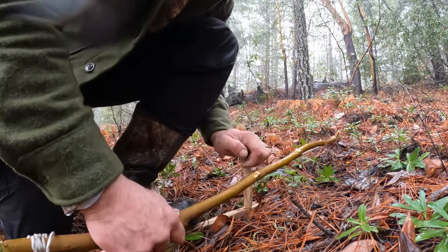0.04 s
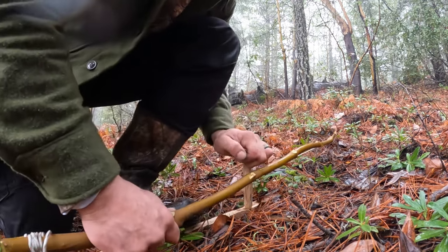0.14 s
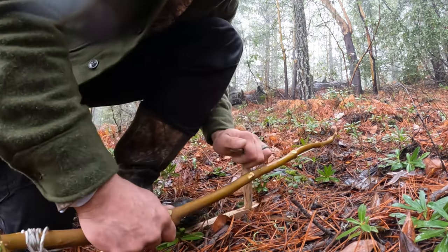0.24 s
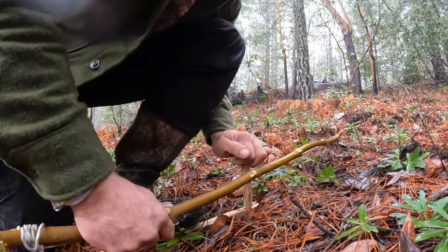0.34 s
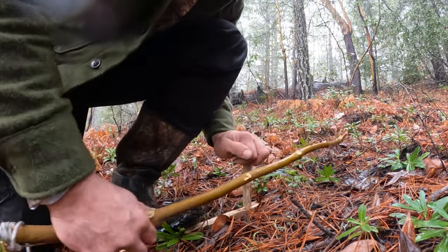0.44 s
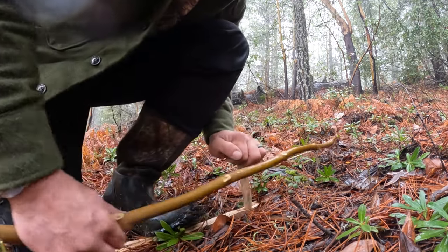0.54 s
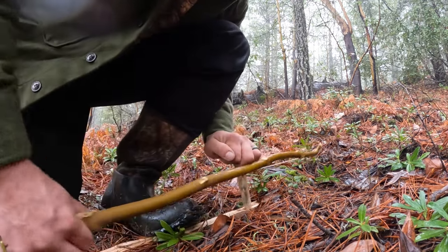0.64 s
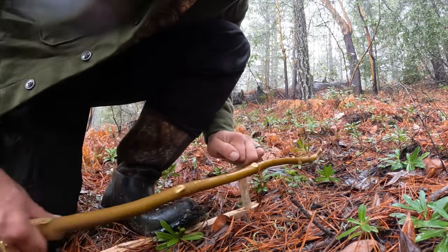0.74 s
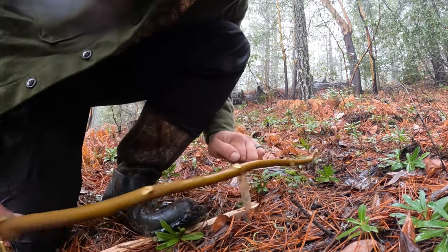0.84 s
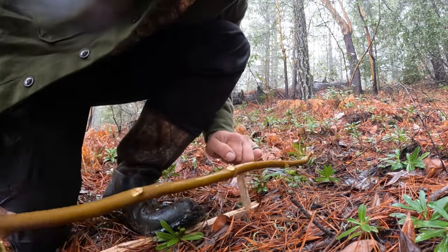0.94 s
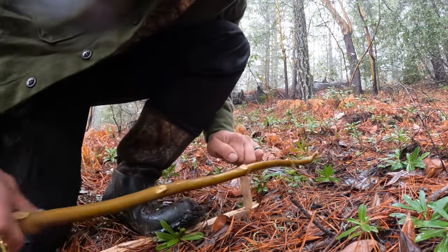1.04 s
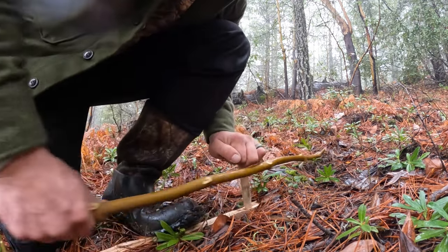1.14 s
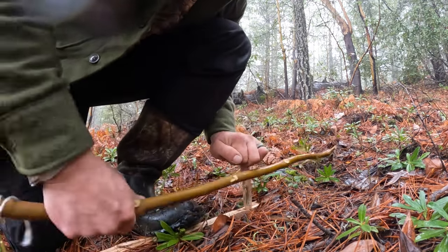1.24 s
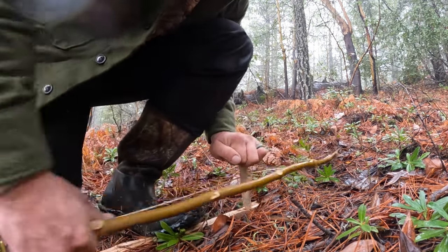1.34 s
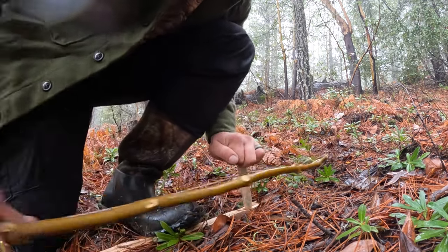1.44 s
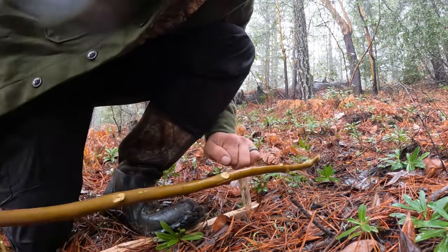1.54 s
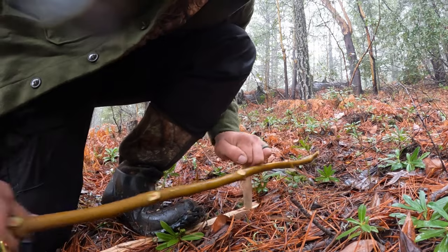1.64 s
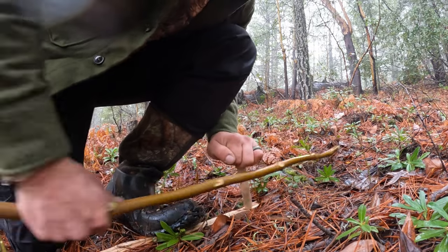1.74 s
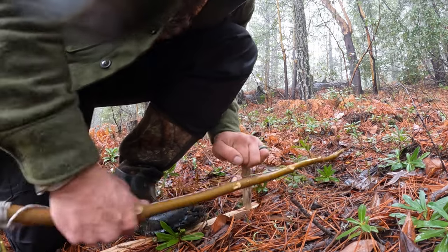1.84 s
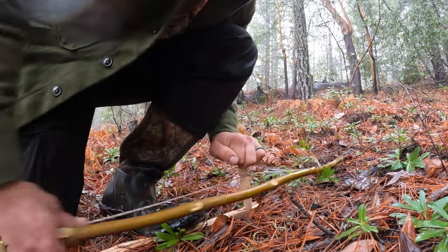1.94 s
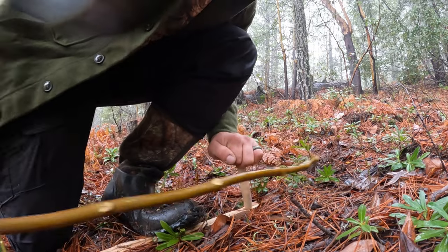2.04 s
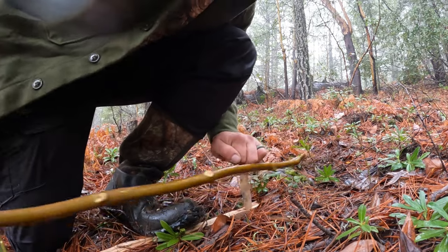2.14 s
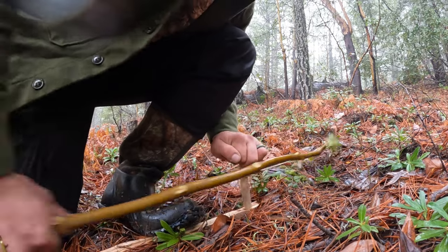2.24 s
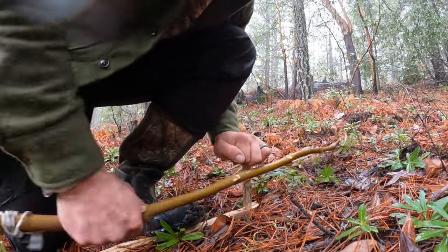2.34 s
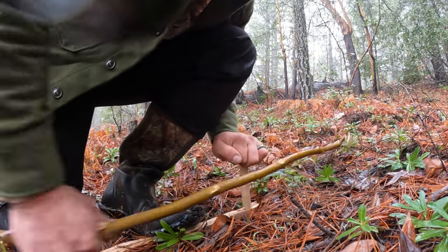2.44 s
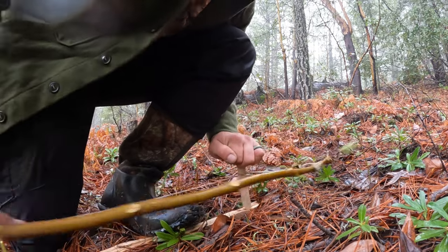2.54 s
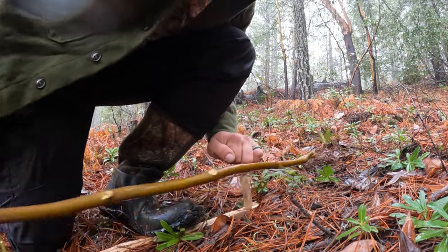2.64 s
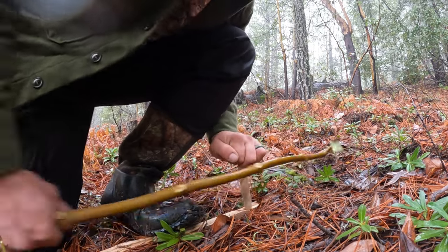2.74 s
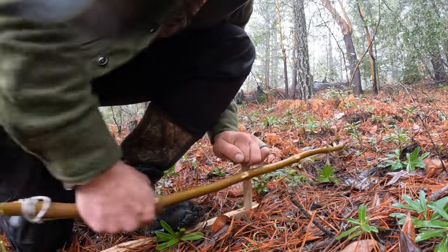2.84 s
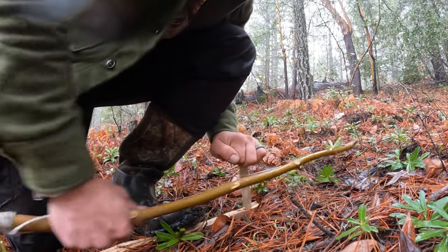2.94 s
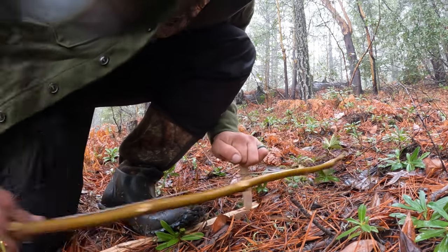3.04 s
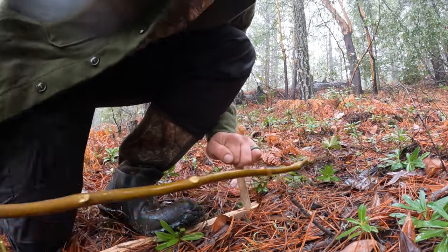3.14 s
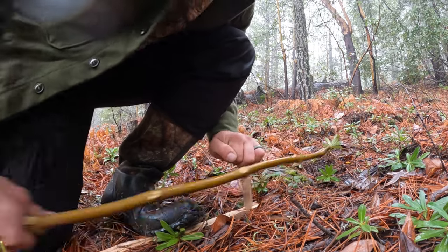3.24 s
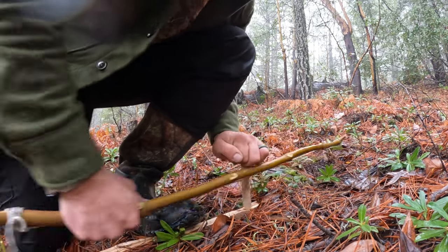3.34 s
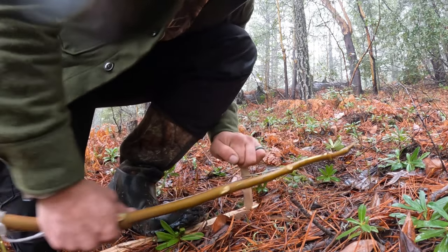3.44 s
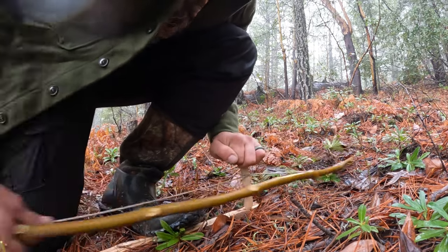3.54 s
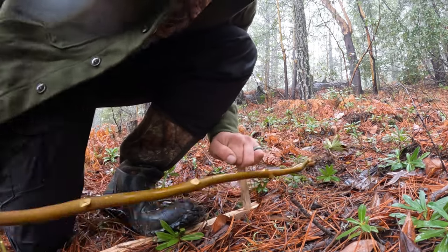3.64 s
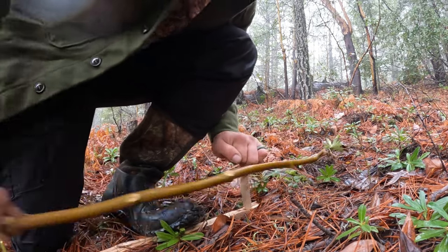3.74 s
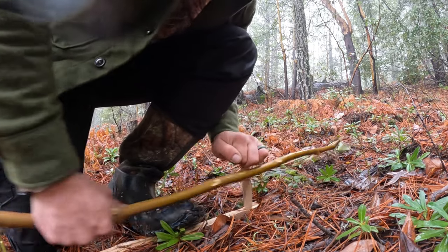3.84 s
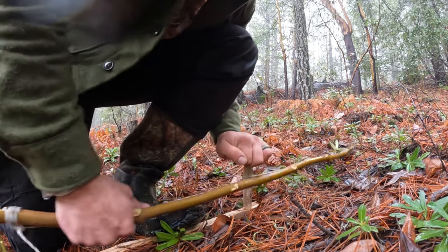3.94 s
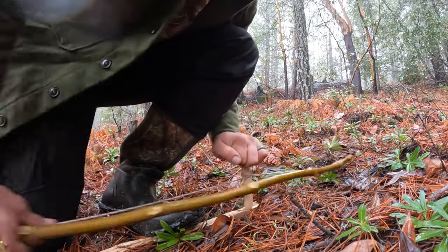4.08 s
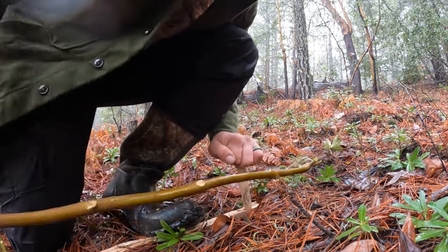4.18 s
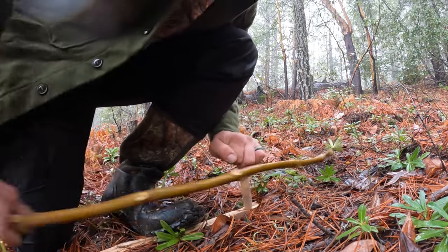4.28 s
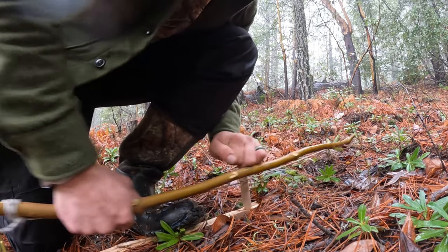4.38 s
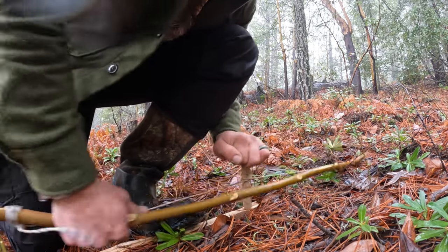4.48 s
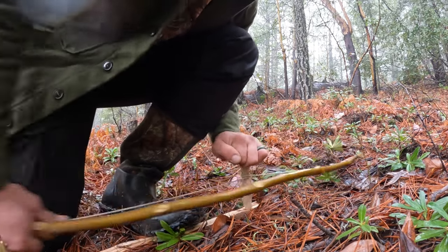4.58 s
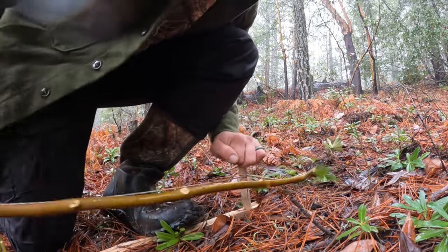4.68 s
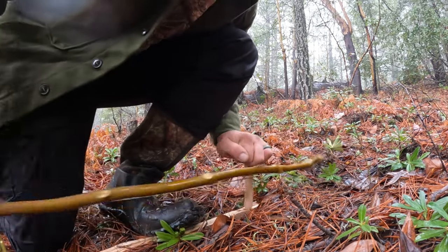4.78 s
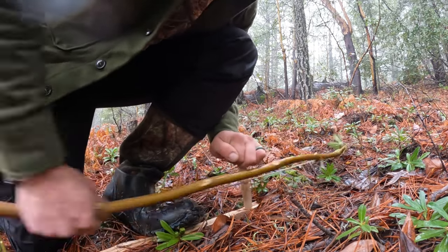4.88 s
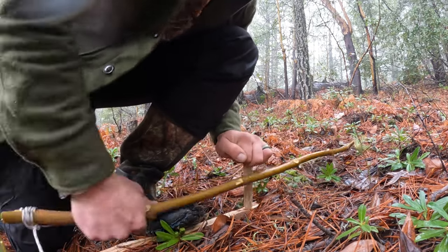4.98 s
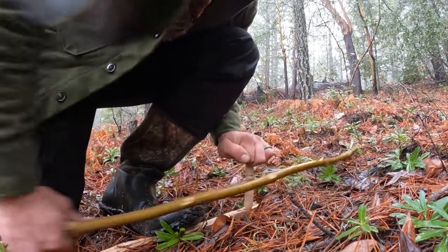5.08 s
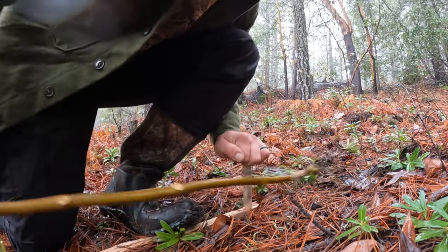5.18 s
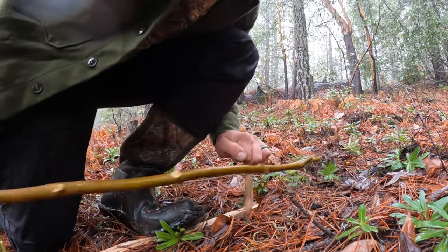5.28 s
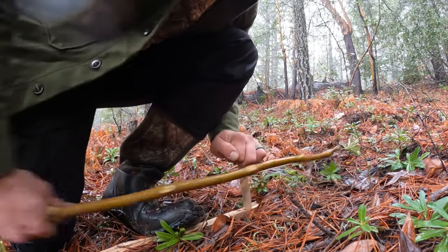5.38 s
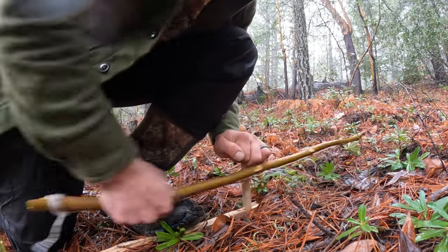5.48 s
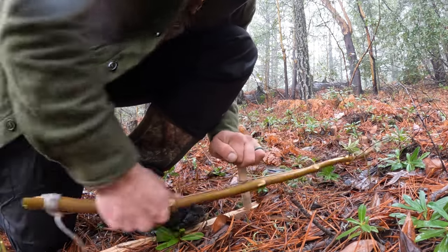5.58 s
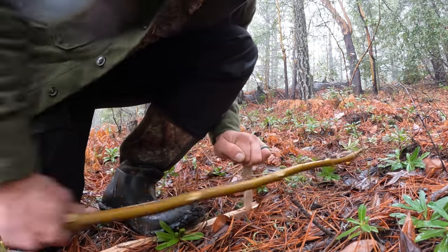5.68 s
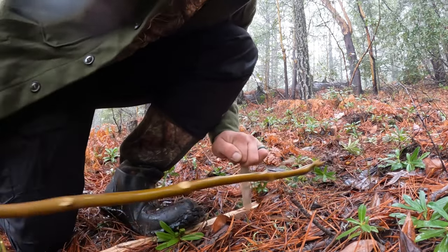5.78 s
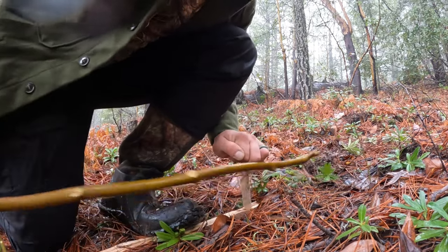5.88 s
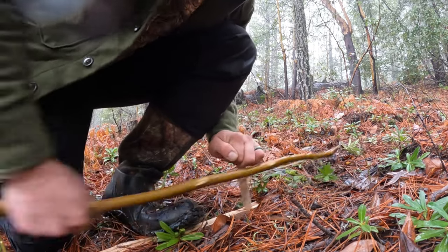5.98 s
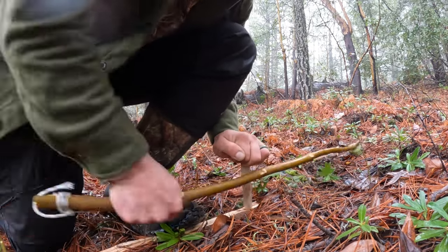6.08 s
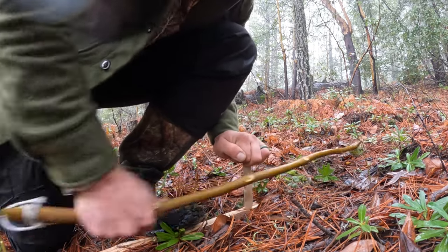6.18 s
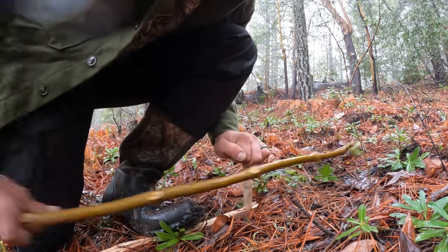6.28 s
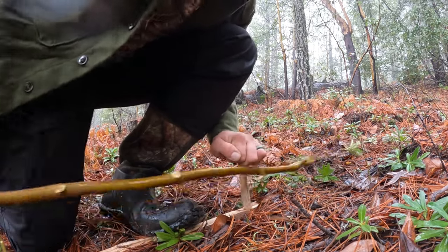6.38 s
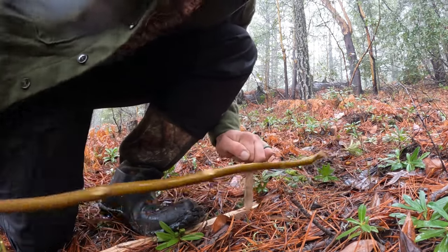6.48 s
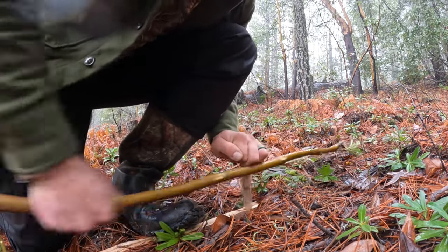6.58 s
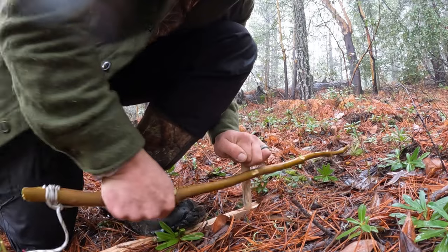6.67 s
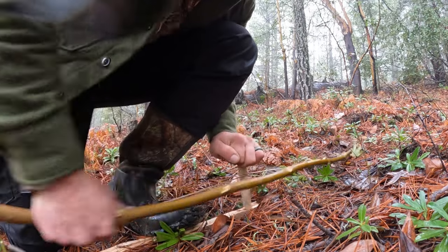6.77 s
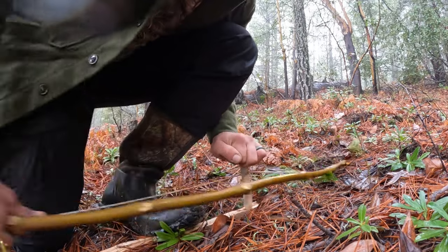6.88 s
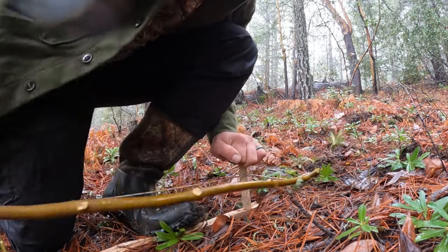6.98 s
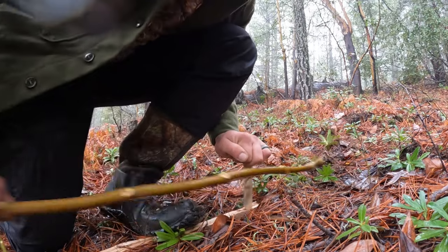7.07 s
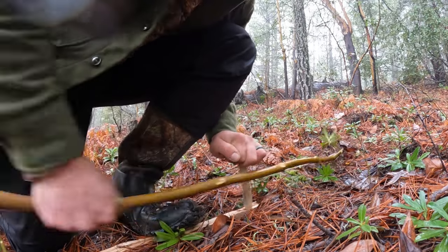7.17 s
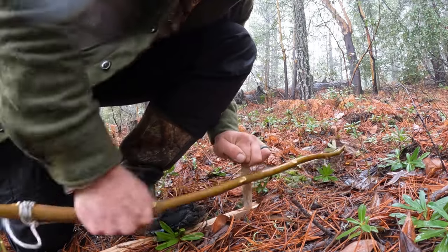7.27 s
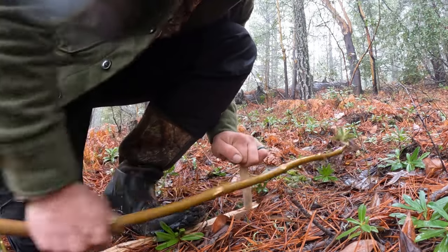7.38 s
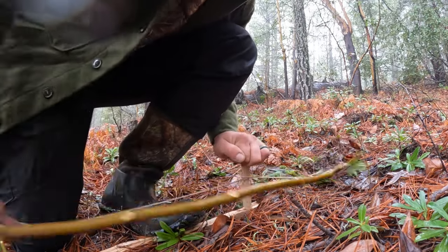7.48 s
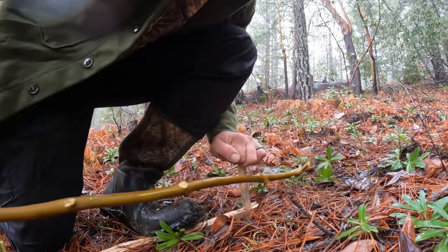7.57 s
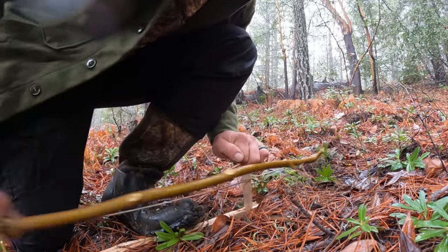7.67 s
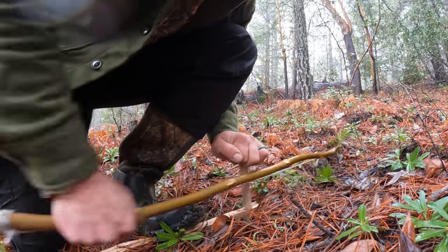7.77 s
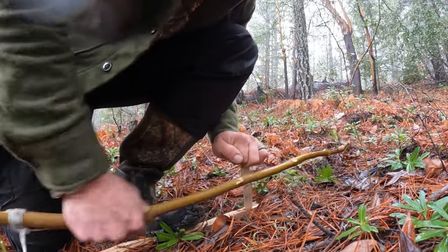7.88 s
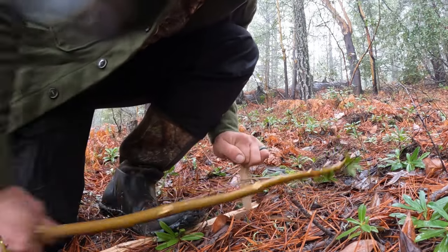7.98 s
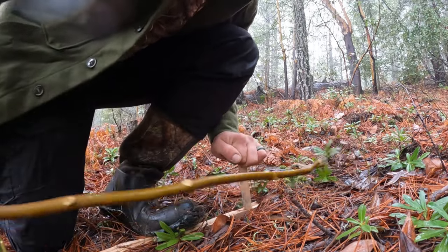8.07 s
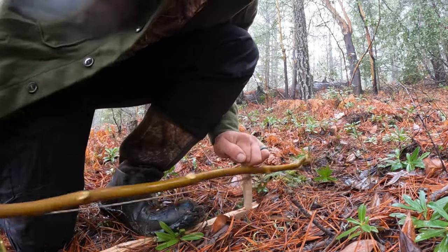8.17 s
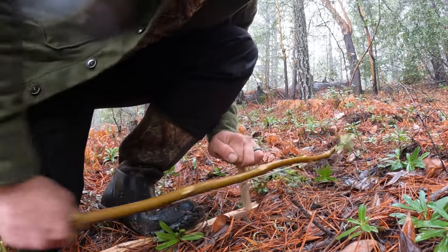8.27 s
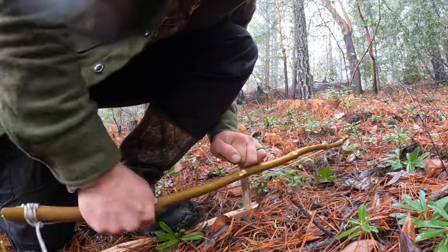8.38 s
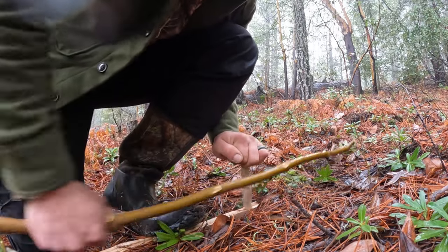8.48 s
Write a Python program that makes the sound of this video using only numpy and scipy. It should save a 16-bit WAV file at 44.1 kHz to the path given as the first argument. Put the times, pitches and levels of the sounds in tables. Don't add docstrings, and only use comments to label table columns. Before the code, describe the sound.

A wooden spindle is sawn back and forth in its board by a bow drill, raspy scraping strokes with brief groans, squeaks and snaps outdoors.

```python
import sys
import numpy as np
from scipy import signal
from scipy.fft import rfft, irfft
from scipy.io import wavfile
from scipy.ndimage import uniform_filter1d

SR = 44100
rng = np.random.default_rng(int(sys.argv[2]) if len(sys.argv) > 2 else 0)


def volts_from_db(level):
    exponent = np.asarray(level, float) / 20
    return 10 ** exponent


def waveform_to_disk(signal):
    frames = np.transpose(np.atleast_2d(signal))
    scaled = np.clip(frames, -1, 1) * 32767
    samples = np.round(scaled).astype(np.int16)
    wavfile.write(sys.argv[1], SR, samples)


N = 375732


def level(x, db=0):
    return x * volts_from_db(db) / np.sqrt(np.mean(x ** 2))


def colour(x, points):
    hz, db = np.transpose(points)
    f = np.maximum(np.arange(N // 2 + 1) * SR / N, 1)
    gain_db = np.interp(np.log(f), np.log(np.maximum(hz, 1)), db)
    return irfft(rfft(x) * volts_from_db(gain_db), N)


def band(x, hz, width_hz):
    return signal.lfilter(*signal.iirpeak(hz, hz / width_hz, fs=SR), x)


def walk(rate):
    hold = int(SR / rate)
    steps = np.repeat(rng.standard_normal(N // hold + 1), hold)
    return 1.186 * uniform_filter1d(uniform_filter1d(steps, hold), hold)[:N]


def grit(spread_db):
    return level(rng.standard_normal(N) * volts_from_db(spread_db * rng.exponential(size=N)))


def curve(table):
    s, *columns = np.transpose(table)
    return [np.interp(np.arange(N) / SR, s, c) for c in columns]


def add(out, s, burst):
    i = max(int(s * SR), 0)
    out[..., i:i + burst.shape[-1]] += burst[..., :N - i]


# (frequency [Hz], level [dB])
PORT_DIFFERENCE = [(60, -5), (110, -4.5), (200, -14.5), (380, -4), (700, -8), (1290, -3.5), (2380, -4),
                   (4400, -2.5), (8120, -7.5), (15000, 5.5)]


def ports(mid):
    side = colour(np.roll(mid, 2600), PORT_DIFFERENCE) * volts_from_db(-7.5)
    return np.array([mid + side, mid - side])


# (turnaround [s], its lull [s], groan level [dB], drumming level [dB])
STROKES = [(1.07, 0.11, -49, -53), (1.391, 0.061, -52.5, -47.5), (1.683, 0.078, -46.5, -45),
           (1.957, 0.056, -48.0, -43.5), (2.241, 0.053, -46.5, -48), (2.5, 0.055, -49.5, -44.0),
           (2.762, 0.062, -44.0, -43.0), (3.018, 0.044, -46.5, -43), (3.279, 0.058, -45.5, -44.0),
           (3.526, 0.053, -48.0, -44.0), (3.799, 0.064, -45.0, -44.5), (4.057, 0.063, -51, -48),
           (4.325, 0.074, -40.5, -41), (4.565, 0.054, -46.5, -43.5), (4.848, 0.095, -44, -43),
           (5.106, 0.051, -45.0, -43), (5.387, 0.065, -41.0, -41), (5.671, 0.061, -42.5, -43.0),
           (5.971, 0.048, -41.5, -41), (6.246, 0.072, -47.0, -47), (6.545, 0.081, -41.5, -45),
           (6.822, 0.058, -51, -47.0), (7.127, 0.097, -45.5, -45.0), (7.407, 0.052, -48.5, -46),
           (7.686, 0.086, -42.5, -40.0), (7.951, 0.071, -50.5, -45), (8.227, 0.1, -43, -45)]
LAST_TURN_S, LAST_LULL_S = 8.53, 0.12


def strokes():
    s, *columns = np.transpose(STROKES)
    return s, np.diff(s, append=LAST_TURN_S), *columns


def swells(at, spread, db):
    start, length, *_ = strokes()
    return zip(start + at * length, db, spread * length)


def bearing(swells, scrape_db, under_db):
    t = np.arange(N) / SR
    power = volts_from_db(2 * (scrape_db - under_db))
    for s, db, spread_s in swells:
        now = slice(int((s - .25) * SR), int((s + .25) * SR))
        power[now] += volts_from_db(2 * db) * np.exp(-((t[now] - s) / spread_s) ** 2 / 2)
    return np.sqrt(power)


# (speeding-up time [lulls], level at speed [dB],
# level before slowing [dB], slowing time [lulls], mid-stroke arch [dB])
PUSH = (0.63, -43.5, -44.5, 0.69, 5)
PULL = (0.82, -43, -44, 0.55, 3)
# (time [s], scrape level [dB])
CREEP = [
    (0.0, -56),
    (.09, -65),
    (.26, -65),
    (.55, -53),
    (1.0, -48),
    (1.07, -68),
]
# (time [s], level [dB])
NUDGES = [
    (.56, -46.5),
    (.725, -42.5),
    (.868, -44),
    (.99, -48),
]
NUDGE_SPREAD_S = 0.01636
REST_DB, REST_DB_PER_S = -60, -150
DWELL, EASE = 0.247, 1.113
SCRAPE_PER_GROAN_DB = 0.1371


def rest_level(lull_s, mean_lull_s):
    return volts_from_db(REST_DB + REST_DB_PER_S * (lull_s - mean_lull_s))


def speed_db():
    t = np.arange(N) / SR
    nudges = [(s, db, NUDGE_SPREAD_S) for s, db in NUDGES]
    out = 20 * np.log10(bearing(nudges, curve(CREEP)[0], under_db=-1))
    start, length, lull, groan, _ = strokes()
    next_lull = np.append(lull[1:], LAST_LULL_S)
    ways = (PUSH, PULL) * len(start)
    for s, d, lull_a, lull_b, groan_db, way in zip(start, length, lull, next_lull, groan, ways):
        up, up_db, down_db, down, arch_db = way
        up_s, down_s = up * lull_a, down * lull_b
        now = slice(int(s * SR), int((s + d) * SR) + 1)
        since, until = t[now] - s, s + d - t[now]
        u = np.clip((since - up_s) / (d - up_s - down_s), 0, 1)
        full_db = up_db + (down_db - up_db) * u + arch_db * np.sin(np.pi * u)
        full_db = full_db + SCRAPE_PER_GROAN_DB * (groan_db - groan.mean())
        ramp = np.minimum(since / up_s, until / down_s)
        speed = np.clip((ramp - DWELL) / (1 - DWELL), 0, 1) ** EASE
        rest_a, rest_b = rest_level(lull_a, lull.mean()), rest_level(lull_b, lull.mean())
        rest = np.where(since < until, rest_a, rest_b)
        out[now] = 20 * np.log10(speed * volts_from_db(full_db) + (1 - speed) * rest)
    return out


def throb(scrape_db):
    speed = np.clip(volts_from_db(.5 * (scrape_db + 42)), .2, 1.2)
    turn_hz = 29.52 * speed * (1 + 0.125 * walk(11))
    turn = np.cumsum(turn_hz) / SR
    return volts_from_db(1.6 * speed * np.cos(2 * np.pi * turn) + 1.7 * walk(140))


# (frequency [Hz], density [dB per Hz])
SCRAPE = [(590, -44), (1000, -7.5), (1230, -11), (1480, -10), (2160, -10), (2940, -7), (4770, -6.5),
          (5730, -13.5), (7460, -8.5), (8080, -15), (8960, -12), (10100, -23), (11900, -15.5),
          (12900, -26.5), (15600, -41)]
# (frequency [Hz], density [dB per Hz])
SLOW_SCRAPE = [(590, -22.5), (1000, -18), (1170, -13), (2040, -10), (2840, -16.5), (3460, -8),
               (5600, -14.5), (7290, -14), (9820, -23), (11500, -20.5), (15600, -44)]
# (frequency [Hz], width [Hz], level [dB])
SPINDLE_RINGS = [(4800, 330, -21), (7620, 1370, -6.5)]


def scrape(pressure, scrape_db):
    spectrum = rfft(grit(spread_db=2.0) * pressure)
    hz = np.maximum(np.arange(len(spectrum)) * SR / N, 800)
    place = 4 * np.log2(hz / 800)
    slow_db = np.clip(scrape_db + 43, -12, 3)
    fibres = np.zeros(N)
    for k in range(18):
        patch = irfft(spectrum * np.clip(1 - np.abs(place - k), 0, 1), N)
        fibres += volts_from_db(2.52 * walk(55) + 0.076 * max(5 - k, 0) * slow_db) * patch
    rings = sum(volts_from_db(db + 5.6 * walk(40)) * band(fibres, f, w) for f, w, db in SPINDLE_RINGS)
    fibres = fibres + rings
    warm = np.clip((np.arange(N) / SR - 1.03) / 0.053, 0, 1)
    return warm * level(colour(fibres, SCRAPE)) + (1 - warm) * level(colour(fibres, SLOW_SCRAPE))


# (frequency [Hz], width [Hz], level [dB])
SOCKET = [(786, 264, 5), (1460, 250, -1.5)]


def socket(pressure):
    rub = grit(spread_db=2.5) * pressure ** 1.53 * volts_from_db(0.45 * walk(50))
    out = np.zeros(N)
    for hz, width_hz, db in SOCKET:
        once = band(rub, hz, 1.34 * width_hz)
        out += volts_from_db(db) * band(once, hz, 1.34 * width_hz)
    return level(out)


# (frequency [Hz], density [dB per Hz])
BOARD = [(79, -5), (135, 0.5), (156, -2), (202, -2.5), (307, -5.5), (449, -17.5), (560, -27), (730, -22.5),
         (1230, -120)]


def board(pressure):
    return level(colour(grit(spread_db=2.5) * pressure ** 1.28 * volts_from_db(3.3 * walk(20)), BOARD))


def chirps(events, rise_s, fall_s, gain_db):
    t, out = np.arange(int(.03 * SR)) / SR, np.zeros(N)
    shape = (1 - np.exp(-t / rise_s)) ** 2 * np.exp(-t / fall_s)
    for (s, db, hz), (start, glide) in zip(events, rng.random((len(events), 2))):
        cycles = hz * t * (1 + 6 * (glide - .5) * t) + start
        add(out, s - .002, volts_from_db(db + gain_db) * shape / shape.max() * np.sin(2 * np.pi * cycles))
    return out


# (time [s], peak level [dB], frequency [Hz])
GROANS = [(1.806, -37, 850), (2.414, -30, 820), (2.871, -24, 780), (2.919, -26, 829), (3.357, -33, 753),
          (3.393, -37, 668), (3.43, -32, 750), (3.635, -33, 926), (3.885, -26, 902), (3.928, -21, 890),
          (4.933, -33, 733), (4.966, -30, 738), (5.266, -33, 721.5), (5.321, -24.5, 830), (5.479, -28, 886),
          (5.843, -40, 810), (5.876, -37, 770), (6.057, -30, 824), (6.096, -24, 822), (6.126, -21, 980),
          (6.447, -30.5, 795), (6.733, -30, 713), (7.23, -28.5, 810), (7.268, -26, 810), (7.815, -28, 830),
          (7.849, -24, 848), (8.067, -33, 708), (8.322, -27.5, 781), (8.36, -25, 806), (8.396, -20.5, 807)]


def catches():
    t, out = np.arange(int(.05 * SR)) / SR, np.zeros(N)
    bump = (1 - np.exp(-t / 0.0029)) ** 2 * np.exp(-t / 0.0041)
    for s, db, _ in GROANS:
        add(out, s - .002, min(volts_from_db(db + 37), 1.6) * bump)
    return out


def catch_voices():
    return chirps(GROANS, rise_s=0.0033, fall_s=0.0024, gain_db=-8)


# (time [s], peak level [dB], frequency [Hz])
SQUEAKS = [(.0094, -32.5, 1910), (1.4676, -44, 1350), (2.378, -39.5, 1570), (2.5856, -38.5, 1540),
           (2.8919, -34, 1490), (3.1269, -30.5, 1466), (3.164, -38, 1495), (3.8824, -37, 1526),
           (4.4215, -43, 1417), (5.21, -30.5, 1570), (5.8727, -37.5, 1637), (6.124, -33, 1362),
           (6.384, -39, 1543), (6.4518, -44, 1486), (6.6728, -33.5, 1403), (7.1505, -53, 1702),
           (7.2265, -41, 1512), (8.0606, -39, 1592), (8.2627, -47, 1315)]


def squeaks():
    return chirps(SQUEAKS, rise_s=0.002, fall_s=0.0031, gain_db=1.0)


# (time [s], frequency [Hz])
BOW_HZ = [
    (1.5, 55.2),
    (1.83, 67.6),
    (3.69, 62.36),
    (7.72, 71.03),
    (8.52, 61.36),
]


def bow():
    cycles = np.cumsum(curve(BOW_HZ)[0] * (1 + 0.0418 * walk(17))) / SR
    upper = volts_from_db(-9 + 4.1 * walk(12)) * np.sin(2 * np.pi * 1.86 * cycles)
    return level(volts_from_db(1.0 * walk(9.5)) * np.sin(2 * np.pi * cycles)) + upper


def ringing(events, t60_s):
    s, peak_db = np.transpose(events)
    late = np.arange(0, N, 64) / SR - s[:, None]
    db = np.where(late > 0, -60 * late / t60_s, -4.3 * (late / 0.043) ** 2) + peak_db[:, None]
    return np.repeat(volts_from_db(2 * db).sum(axis=0), 64)[:N]


# (time [s], level [dB])
PLUCKS = [
    (0.0, -64),
    (1.8, -50.5),
    (2.45, -46.5),
    (4.5, -42.5),
    (4.85, -43),
    (5.58, -41.5),
    (6.12, -38),
    (6.7, -40.5),
    (7.87, -45.5),
    (8.42, -45),
]


def hum_size():
    start, length, _, _, drum = strokes()
    jolt_db = -48 + 1.24 * (drum - drum.mean())
    jolts = np.transpose([start + 0.67 * length, jolt_db])
    power = ringing(jolts, t60_s=0.43) + ringing(PLUCKS, t60_s=1.4)
    return uniform_filter1d(np.sqrt(power), size=64)


# (time [s], peak level [dB], frequency [Hz])
TICKS = [(0.0094, -20.5, 1730), (0.023, -34, 1730), (0.097, -39, 3500), (0.1429, -38, 4800),
         (0.394, -37, 2310), (0.8847, -29, 1080), (1.074, -32.5, 4650), (1.712, -35, 4700),
         (1.7903, -35, 4790), (1.9764, -42, 4520), (2.5122, -38, 3870), (2.5686, -28, 3400),
         (2.808, -33, 4116), (3.2913, -42, 4728), (3.535, -35, 4960), (3.9064, -21.5, 4716),
         (3.9969, -30, 1880), (4.0617, -39, 4740), (4.3266, -36, 3887), (4.8862, -36, 2515),
         (5.5139, -17, 4200), (5.6195, -35, 1940), (5.7117, -32, 2332), (5.7215, -26.5, 3326),
         (5.9933, -48, 4850), (6.1259, -11, 3873), (6.542, -36, 2700), (7.1514, -20.5, 1912),
         (7.1546, -30, 4790), (8.2627, -31.5, 2470)]


def ticks():
    t, out = np.arange(int(.03 * SR)) / SR, np.zeros(N)
    shape = np.exp(-np.log(1000) * t / 0.0076) * np.minimum(t / 0.00059, 1)
    damp_wood = signal.butter(4, 8500, fs=SR)
    for (s, db, hz), noise in zip(TICKS, rng.standard_normal((len(TICKS), len(t)))):
        splinter = band(band(noise, hz, 2.2 * hz), hz, 2.2 * hz)
        splinter = signal.lfilter(*damp_wood, splinter)
        crack = shape * (0.7 * np.sin(2 * np.pi * hz * t) + splinter / splinter.std())
        add(out, s + .0004, volts_from_db(db) * crack / np.abs(crack).max())
    return out


# (time [s], peak level [dB], frequency [Hz], ring [s])
KNOCKS = [(0.009, -30, 344, 0.027), (0.746, -40.5, 177, 0.058), (0.885, -30.5, 228, 0.056),
          (.93, -40, 280, 0.053), (1.0, -42, 269, 0.046), (1.596, -34, 261, 0.039),
          (4.46, -29.5, 115.1, 0.093), (4.99, -32.5, 105, .1), (5.623, -19.5, 235, 0.045),
          (5.707, -36, 194, 0.05), (6.125, -23.5, 130, 0.068), (6.1255, -22, 560, 0.012),
          (8.07, -33, 202, .09), (7.1858, -26.5, 160, 0.025)]


def knocks():
    t, out = np.arange(int(.12 * SR)) / SR, np.zeros(N)
    for s, db, hz, ring_s in KNOCKS:
        fade = np.exp(-np.log(1000) * t / max(ring_s, .01))
        hollow = 0.95 * fade ** 3 * np.sin(2 * np.pi * 520 * t)
        blow = fade * (np.sin(2 * np.pi * hz * t) + hollow)
        add(out, s, volts_from_db(db - 1.5) * np.minimum(t / 0.0028, 1) * blow)
    return out


# (start [s], end [s], frequency [Hz], width [Hz], level [dB])
CORD = (.33, .58, 2400, 250, -62)


def cord():
    start, end, hz, width_hz, db = CORD
    u = np.clip((np.arange(N) / SR - start) / (end - start), 0, 1)
    return np.sqrt(np.sin(np.pi * u).clip(0)) * level(band(grit(spread_db=0.0), hz, width_hz), db)


# (time [s], level [dB])
GROUND = [
    (0.0, -51),
    (0.43, -66),
    (2.42, -50),
    (8.21, -50),
    (8.52, -47),
]


def soil(scrape_db):
    sway_db = curve(GROUND)[0] + 0.15 * (scrape_db + 45)
    rumble = band(band(rng.standard_normal(N), 28, 37), 28, 37)
    return volts_from_db(sway_db) * ports(level(rumble))


# (frequency [Hz], density [dB per Hz])
HUSH = [(15, -38), (25, 1), (112, -25), (142, 5), (207, 1), (475, -22), (1350, -10.5), (5280, -13),
        (9020, -20), (15000, -89)]


def hush():
    air = rng.standard_normal(N) * volts_from_db(4.0 * walk(16.0))
    return volts_from_db(-57.5) * ports(level(colour(air, HUSH)))


def scene():
    scrape_db = speed_db()
    *_, groan_db, drum_db = strokes()
    pressure = throb(scrape_db) * (1 + catches())
    rub = volts_from_db(scrape_db) * ports(scrape(pressure, scrape_db))
    groan_size = volts_from_db(-0.5) * bearing(swells(.54, 0.13, groan_db), scrape_db, under_db=20.5)
    groan = groan_size * ports(socket(pressure))
    drum_size = volts_from_db(0.15) * bearing(swells(0.59, 0.16, drum_db), scrape_db, under_db=14)
    drum = drum_size * ports(board(pressure))
    hum = hum_size() * bow()
    voiced = catch_voices() + squeaks()
    small = cord() + ticks() + knocks()
    return rub + groan + drum + hum + voiced + small + soil(scrape_db) + hush()


# (frequency [Hz], left minus right [dB])
LEAN = [(60, 1.5), (110, 2), (200, -1.5), (380, -1.0), (700, -2), (1290, -2.5), (2380, -1), (4400, 1),
        (8120, -1), (15000, 4.5)]


def lean(dry):
    return [colour(x, [(hz, side * db / 2) for hz, db in LEAN]) for x, side in zip(dry, (1, -1))]


def low_pass(x):
    return signal.sosfilt(signal.butter(12, 15700, fs=SR, output="sos"), x)


def record(dry):
    near = band(dry.mean(axis=0), 3070, 2600)
    skew = 0.3 * (np.roll(near, 4) - np.roll(near, -4)) / 2
    left, right = lean(dry)
    top_cut = signal.ellip(8, .2, 60, 15500, fs=SR, output="sos")
    mix = signal.sosfilt(top_cut, np.array([left + skew, right - skew]))
    return low_pass(mix)


dry = scene()
out = record(dry)
waveform_to_disk(out)
```